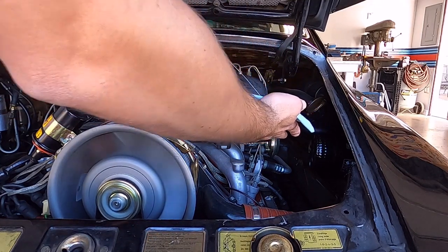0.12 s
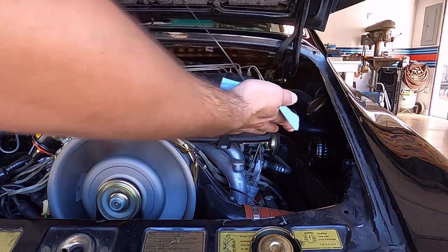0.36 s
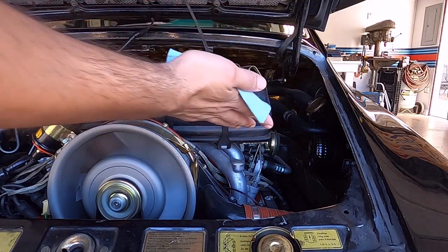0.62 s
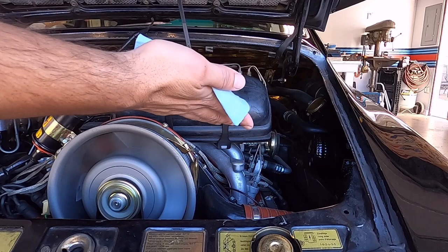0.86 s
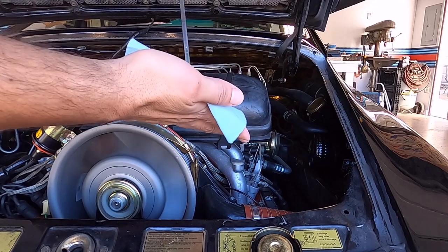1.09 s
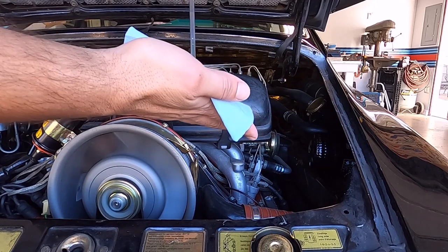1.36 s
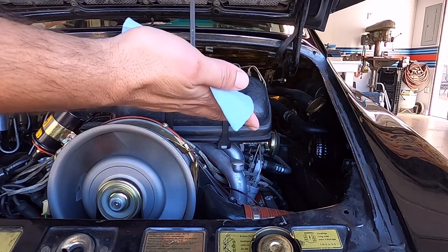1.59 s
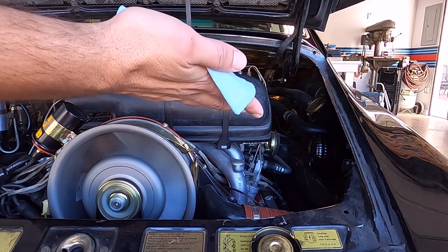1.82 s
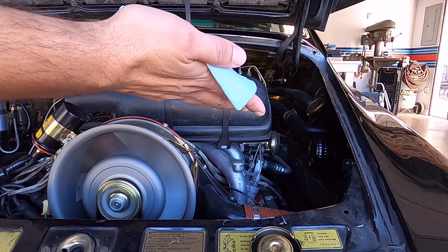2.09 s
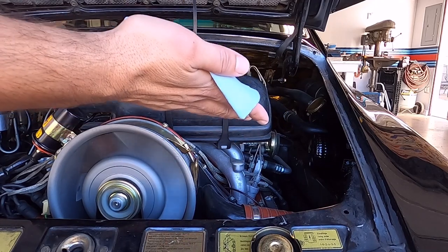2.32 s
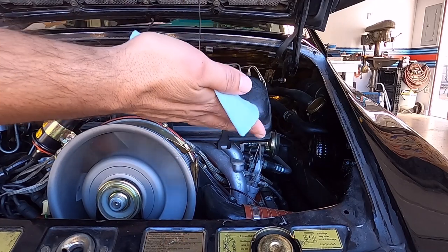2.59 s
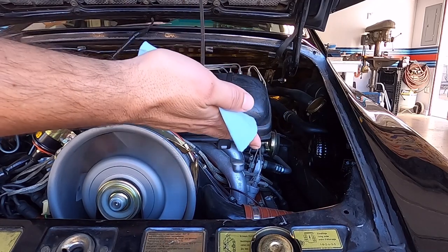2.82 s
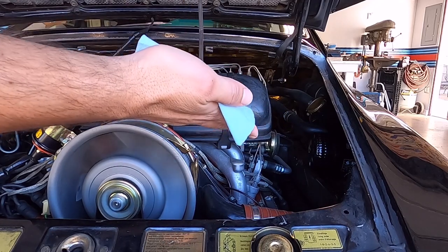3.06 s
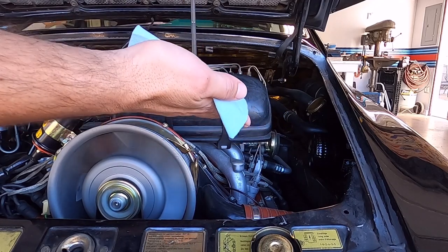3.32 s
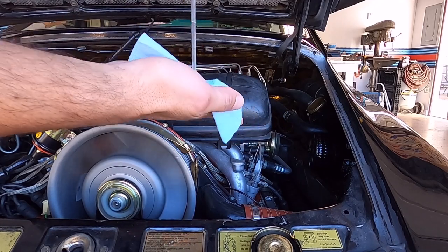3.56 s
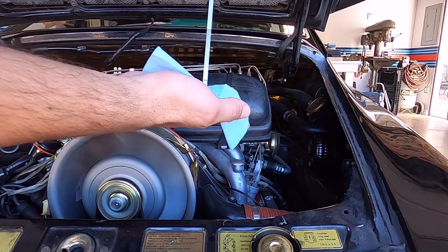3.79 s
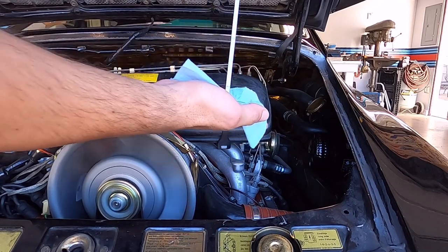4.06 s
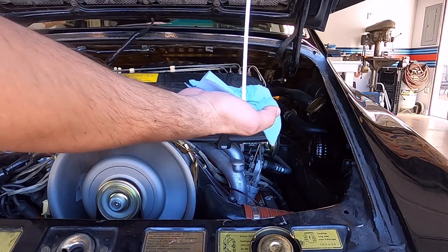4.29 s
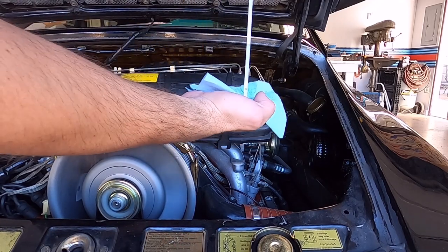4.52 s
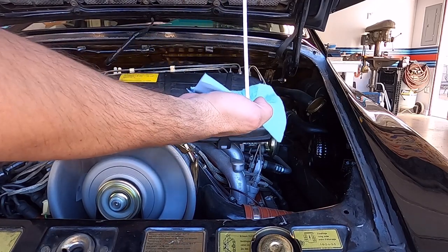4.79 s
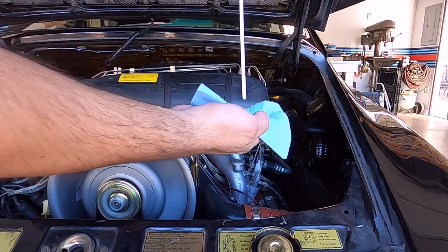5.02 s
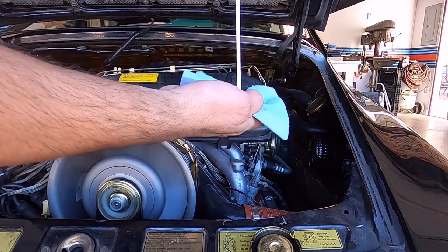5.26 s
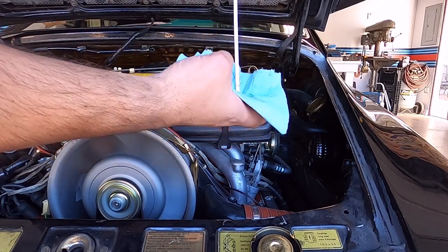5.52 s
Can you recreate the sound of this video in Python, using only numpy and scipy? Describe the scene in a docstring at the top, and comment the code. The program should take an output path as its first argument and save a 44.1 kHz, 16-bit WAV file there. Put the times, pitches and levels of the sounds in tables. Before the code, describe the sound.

An air-cooled six-cylinder engine idles steadily up close, deep throbbing exhaust under a broad fan rush, with metallic case knocks and light valve ticking.

```python
"""In a garage, an air-cooled six-cylinder engine idles close by with its lid open.
The exhaust throbs as gas pulses pass down two pipes; now and then a slow burn lets part of one out late.
Blows ring the case, whose knocks also echo softly from the walls.
Bursts of noise make the valve ticks and intake puffs; steady, coloured noise makes the fan's rush."""
import sys
import numpy as np
from scipy import signal
from scipy.fft import rfft, irfft, next_fast_len
from scipy.io import wavfile
from scipy.ndimage import uniform_filter1d, map_coordinates

SR = 44100
rng = np.random.default_rng(int(sys.argv[2]) if len(sys.argv) > 2 else 0)


def output_pcm(signal):
    """Save a mono or channel-first signal as 16-bit PCM at the path in sys.argv[1].

    Samples are clipped to [-1, 1] before scaling.
    """
    pcm = np.clip(np.atleast_2d(signal).T, -1, 1) * 32767
    wavfile.write(sys.argv[1], SR, np.round(pcm).astype(np.int16))


def undo_db(level):
    """Turn decibels back into plain size, where 20 dB means ten times bigger."""
    steps = np.asarray(level, float) / 20
    return 10 ** steps


N = 248724  # length in samples
LEAD = SR // 4  # samples the engine has run before time zero
START_DEG = -44.8  # crank angle at time zero, 720 to a cycle

# Crankshaft speed: t/s, speed/rpm
CRANK_SPEED = [(0.0, 1036.8), (0.38, 985.5), (1.01, 1011.4), (1.27, 974.6), (1.43, 986.2), (2.38, 976.5),
               (2.52, 1003.2), (3.02, 991.9), (3.14, 960.2), (3.48, 1006.6), (3.79, 1022.4), (4.09, 953.6),
               (4.31, 1011.4), (4.79, 991.7), (4.94, 1007.5), (5.12, 970.4), (5.42, 1016.2), (5.64, 985.7)]
# Exhaust pulses, three cylinders to a bank: crank angle/deg, relative level/dB
FIRINGS = [
    [(122, .2), (361, 0), (601, -.6)],
    [(8, 1.1), (249.4, -.5), (491.4, -.6)],
]
# Slow burns in the first bank: t/s, share of the pulse that leaves late (0-1)
SLOW_BURNS = [(.981, 0), (1.591, .2), (1.832, .6), (2.326, .35), (2.932, 0.27), (4.016, .45), (4.501, .25)]
# Exhaust pipe resonances of each bank: f/Hz, width/Hz, signed relative gain
PIPES = [
    [(68.5, 44.6, .088), (77.7, 24.6, -.15), (122.2, 22.2, -.01)],
    [(46.3, 22, .055), (94.7, 58.5, -.049), (95.1, 22.1, .074)],
]
# Ringing modes of crankcase and tinware: f/Hz, width/Hz, relative level/dB
CASE_MODES = [(320, 20, -2), (346, 18, -6), (379, 15, 0), (412, 22, -10), (646, 48, -17), (683, 35, -15),
              (935, 55, -21)]
# Blows on the case: crank angle/deg, relative level/dB, f/Hz of the modes that ring fully where it lands
BLOWS = [(29.8, -3, (412, 646, 683, 935)), (85.1, -2, (320, 346, 379, 935)), (231.5, -2, (320, 683, 935)),
         (287.0, -2, (346, 412, 646, 683, 935)), (491.3, -2, (320, 346, 683, 935)),
         (687.4, -3, (320, 346, 412, 646, 935))]
# Valve gear contacts: crank angle/deg, kind of rattle, relative level/dB
TICKS = [(52, "low", -39.5), (98, "low", -43), (218, "high", -41), (228, "low", -41), (332, "high", -41),
         (361, "high", -41), (462, "low", -38.5), (465, "broad", -41), (580, "high", -39),
         (612, "broad", -40), (700, "broad", -41), (712, "low", -39.5)]
# Colour of each kind of rattle, by name: f/Hz, width/Hz
RATTLES = {"low": (1230, 400), "broad": (2100, 1300), "high": (2950, 900)}
# Intake strokes: crank angle/deg, relative level/dB
PUFFS = [(92, -4), (216, 0), (336, -.5), (462, -1.5), (575, -1.5), (696, -1.5)]
# Colour of the intake hiss: f/Hz, relative level/dB
INTAKE_COLOUR = [(2000, -16), (4000, 8), (5000, -1), (7500, -2.5), (10000, -14), (12500, -14.5),
                 (15200, -41), (17000, -82)]
# Colour of the fan's rush: f/Hz, relative level/dB
FAN_COLOUR = [(14, -14), (33, 7), (55, -5.5), (90, 7.5), (180, -2.5), (280, 7), (520, -11), (780, -10),
              (1020, -10), (3050, -15), (4500, -19), (7430, -29), (12300, -40.5), (15200, -53),
              (17000, -100)]
# Bands that lift and hollow the rush, the housing's peaks among them, with narrow dips near 1 and 1.2 kHz:
# f/Hz, width/Hz, level/dB
RUSH_BANDS = [(287, 28, -47), (307.4, 42, 9), (394.8, 40, 16), (430.5, 41, -16), (614, 40, 10.5),
              (655.7, 26, 10), (932.5, 72, 9), (1008, 45, -9), (1125, 91, 4.5), (1209, 52, -7), (1310, 440, 3),
              (1968, 61, 5.5), (2156, 40, 2.5), (2590, 130, -6), (2654, 95, 8), (2960, 97, 5.5),
              (3900, 40, 4.5)]
# How alike left and right noise are: f/Hz, likeness (1 = the same)
LIKENESS = [(60, 1.0), (110, 1.0), (200, 0.99), (380, 0.97), (690, 0.89), (1280, 0.82), (2350, 0.68),
            (4340, 0.43), (7990, 0.1), (14700, 0.4)]
# Left level over right level at the microphones: f/Hz, level/dB
LEFT_OVER_RIGHT = [(60, 1.0), (150, 1.0), (380, 2), (940, 0.5), (2350, 2.5), (5890, 1.5), (14700, -1.5)]
# How far left lags behind right: f/Hz, phase/rad
LEFT_LAG = [(200, 0), (780, .15), (3100, .6), (4800, .25), (9900, 0)]
# Time the garage takes to fade by 60 dB: f/Hz, t60/s
GARAGE_FADE = [(100, 0.1), (1000, 0.14), (8000, 0.067)]


def unit(x):
    """Scales x to rms 1."""
    return x / np.sqrt(np.mean(x ** 2) + 1e-20)


def along(points, hz):
    """Reads a curve of (f/Hz, value) points on a log frequency axis."""
    f, value = np.transpose(points)
    return np.interp(np.log(hz + 1), np.log(f + 1), value)


def wobble(rate):
    """A smooth random curve through `rate` random points a second."""
    points = rng.standard_normal(int(N * rate / SR) + 4)
    return map_coordinates(points, [np.arange(N) * rate / SR])


def filtered(x, response):
    """Filters x with a complex response given as a function of frequency."""
    m = next_fast_len(x.shape[-1] + SR // 2)
    spectrum = rfft(x, m) * response(np.fft.rfftfreq(m, 1 / SR))
    return irfft(spectrum, m)[..., :x.shape[-1]]


def mode(f, hz, width):
    """The response of one resonance, with a peak gain of 1."""
    return 1j * f * width / (hz * hz - f * f + 1j * f * width)


def rush(gain, patchy_db):
    """Coloured stereo noise of rms 1, with patches of random gain."""
    z = signal.stft(rng.standard_normal((2, N)), nperseg=512)[2]
    patches = uniform_filter1d(rng.standard_normal(z.shape[1:]), 6, 0)
    patches = unit(uniform_filter1d(patches, 10, 1))
    pair = signal.istft(z * undo_db(patchy_db * patches), nperseg=512)[1][:, :N]

    def mid_side_gain(hz):
        turn = np.arccos(np.clip(along(LIKENESS, hz), -1, 1)) / 2  # shares power by likeness
        return gain(hz) * [np.cos(turn), np.sin(turn)]

    mid, side = filtered(pair, mid_side_gain)
    return unit(np.array([mid + side, mid - side]))


def crank():
    """Four-stroke cycles turned so far; a cycle is two turns of the crankshaft."""
    s, rpm = np.transpose(CRANK_SPEED)
    speed = np.interp(np.arange(-LEAD, N) / SR, s, rpm)
    turned = np.cumsum(speed) / (2 * 60 * SR)
    return START_DEG / 720 + turned - turned[LEAD]


def strikes(cycles, deg, scatter_db, jitter_deg):
    """One impulse each time the crank passes an angle, with random level and timing."""
    turns = np.arange(-2, int(cycles[-1]) + 1)
    chance = rng.standard_normal((len(turns), 2))
    at = np.searchsorted(cycles, turns + (deg + jitter_deg * chance[:, 0]) / 720)
    height = undo_db(scatter_db * chance[:, 1])
    return np.bincount(at, height, len(cycles) + 1)[:len(cycles)]


def bursts(cycles, deg, t60, scatter_db, jitter_deg, rise):
    """An envelope that jumps up at a crank angle and dies away (t60 and rise in s)."""
    t = np.arange(SR // 8) / SR
    shape = undo_db(-60 * t / t60) * (1 - np.exp(-t / rise))
    hits = strikes(cycles, deg, scatter_db, jitter_deg)
    return signal.fftconvolve(hits, shape / shape.max())[LEAD:LEAD + N]


def garage(x):
    """The walls answer with a noise tail; each frequency in it dies at its own speed."""
    hz, t, z = signal.stft(rng.standard_normal((2, SR // 2)), SR, nperseg=256)
    fade = undo_db(-60 * t / along(GARAGE_FADE, hz)[:, None])
    tail = signal.istft(z * fade, SR, nperseg=256)[1]
    delayed = np.pad(x, (300, 0))[None]  # delay in samples
    return signal.fftconvolve(delayed, tail / np.linalg.norm(tail[0]), axes=1)[:, :N]


def fan():
    """Cooling air rushes through a housing that favours some bands."""
    def colour(f):
        bands_db = sum(db * abs(mode(f, hz, width)) ** 2 for hz, width, db in RUSH_BANDS)
        return undo_db(along(FAN_COLOUR, f) + bands_db)

    level_db = -28.5 + 0.39 * wobble(2.06) + 0.12 * wobble(8.3)
    return undo_db(level_db) * rush(colour, patchy_db=0.36)


def intake(cycles):
    """Air hisses in as each intake valve opens; the draught drifts slowly."""
    gate = sum(undo_db(db) * bursts(cycles, deg, t60=.1, scatter_db=2, jitter_deg=3.2, rise=0.00088)
               for deg, db in PUFFS)
    level_db = -45 + 0.4 * wobble(5.57)
    hiss = rush(lambda f: undo_db(along(INTAKE_COLOUR, f)), patchy_db=2.0)
    return undo_db(level_db) * unit(gate) * hiss


def valves(cycles):
    """Metal contacts rattle as short noise bursts; each kind has its own colour."""
    def gate(kind):
        return sum(undo_db(db) * bursts(cycles, deg, t60=.02, scatter_db=1.5, jitter_deg=2.5, rise=0.0022)
                   for deg, name, db in TICKS if name == kind)

    ticking = sum(gate(kind) * rush(lambda f: abs(mode(f, hz, width)) ** 2, patchy_db=1.5)
                  for kind, (hz, width) in RATTLES.items())
    return undo_db(1.5) * ticking


def case(cycles):
    """Each blow lands elsewhere on the case, so it rings the modes in its own mix."""
    near_node_db = -15  # the other modes barely move there
    blows = [undo_db(db) * strikes(cycles, deg, scatter_db=1.2, jitter_deg=.7) for deg, db, _ in BLOWS]

    def drive(hz):
        return sum(undo_db(near_node_db * (hz not in full)) * blow
                   for blow, (_, _, full) in zip(blows, BLOWS))

    # a second, wider resonance narrows each mode's skirts
    ring = sum(undo_db(db) * filtered(drive(hz), lambda f: mode(f, hz, width) * mode(f, hz, 4 * width))
               for hz, width, db in CASE_MODES)
    return undo_db(-30.5) * unit(ring[LEAD:])


def exhaust(cycles):
    """Each bank sends gas pulses down its own pipe; a slow burn lets part of its pulse out late."""
    late_s = .0063
    pulses = [sum(undo_db(db) * strikes(cycles, deg, scatter_db=.45, jitter_deg=.9) for deg, db in bank)
              for bank in FIRINGS]
    t = np.arange(-LEAD, N) / SR
    late_share = sum(np.clip(share, 0, 1) * (abs(t - s) < .02) for s, share in SLOW_BURNS)
    slow = pulses[0] * late_share
    pulses[0] = pulses[0] - slow + np.roll(slow, round(late_s * SR))

    def outlet(f):
        weak_deep_bass = 1j * f / (40 + 1j * f)
        return weak_deep_bass / (1 + (f / 190) ** 8)  # the muffler takes the top

    banks = [filtered(bank, lambda f: outlet(f) * sum(gain * mode(f, hz, width) for hz, width, gain in pipe))
             for bank, pipe in zip(pulses, PIPES)]
    return undo_db(-14.5) * unit(sum(banks)[LEAD:])


def scene():
    """All the engine's sounds together, with the garage answering the case knocks."""
    cycles = crank()
    knocks = case(cycles)
    air = fan() + intake(cycles)
    return air + valves(cycles) + knocks + undo_db(-18) * garage(knocks) + exhaust(cycles)


def band_limit(x):
    """A steep low-pass at the top of the band."""
    return signal.sosfilt(signal.butter(12, 15330, fs=SR, output="sos"), x)


def record(dry):
    """Two close microphones differ in level and phase by frequency; the converter adds a steady offset."""
    offset = .0068
    side = np.array([[.5], [-.5]])  # half of each difference to the left, half to the right

    def microphones(hz):
        return undo_db(side * along(LEFT_OVER_RIGHT, hz)) * np.exp(-1j * side * along(LEFT_LAG, hz))

    mix = filtered(dry, microphones) + offset
    return band_limit(mix)


dry = scene()
out = record(dry)
output_pcm(out)
```